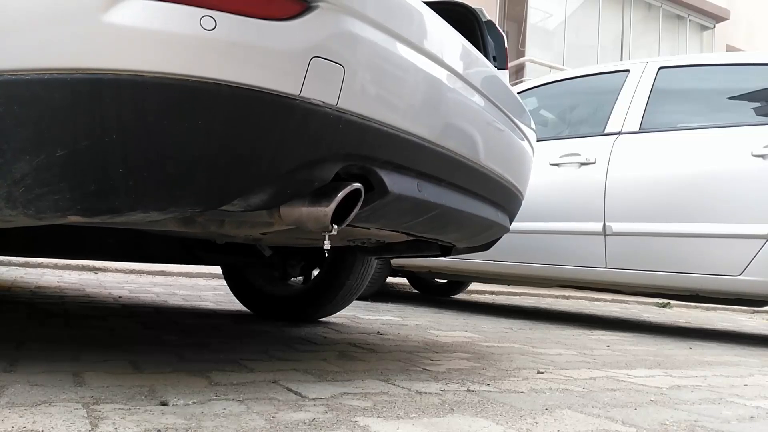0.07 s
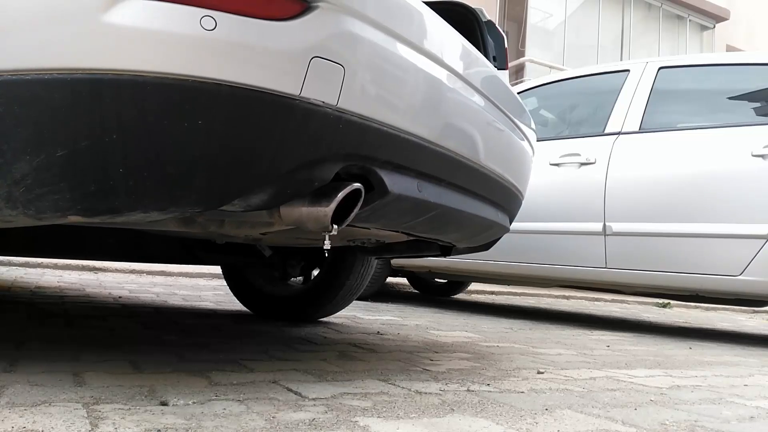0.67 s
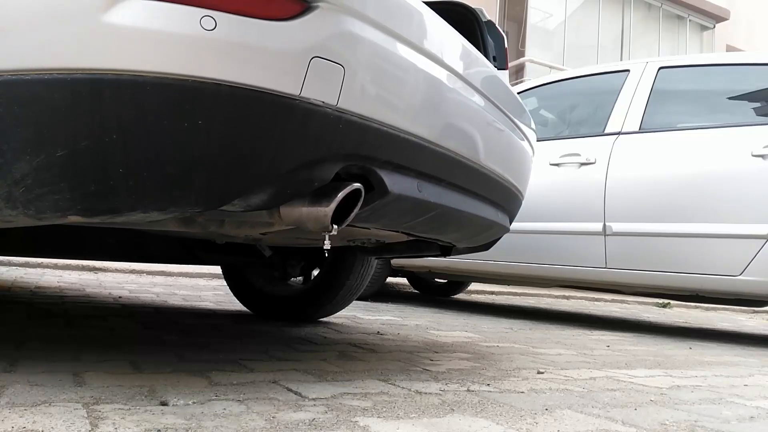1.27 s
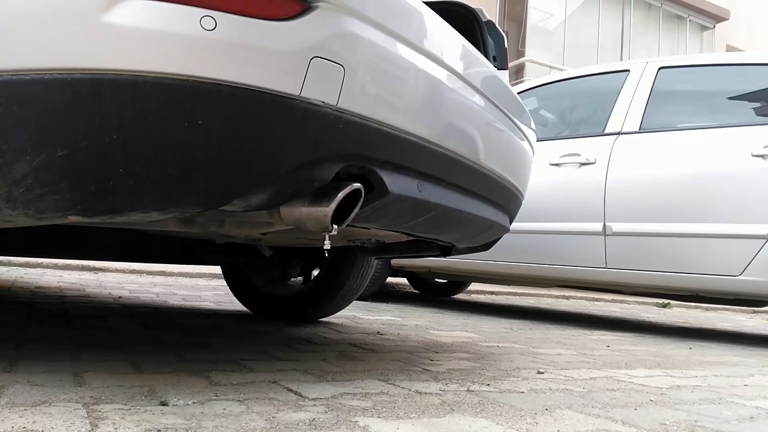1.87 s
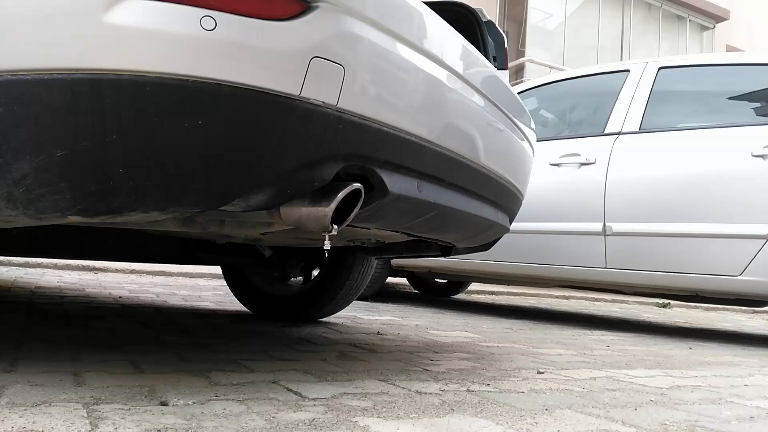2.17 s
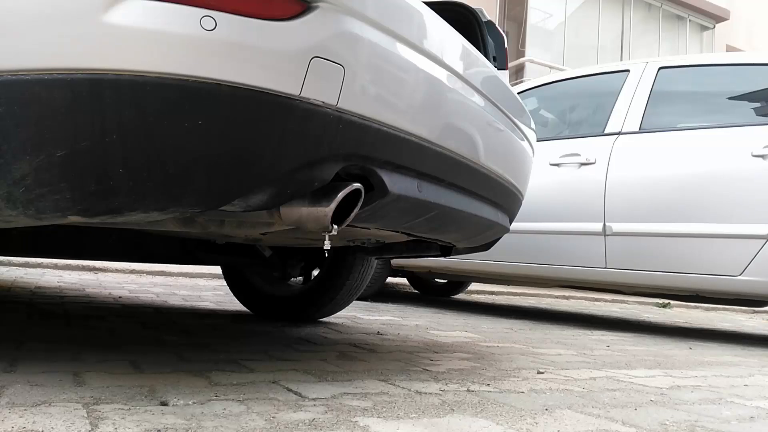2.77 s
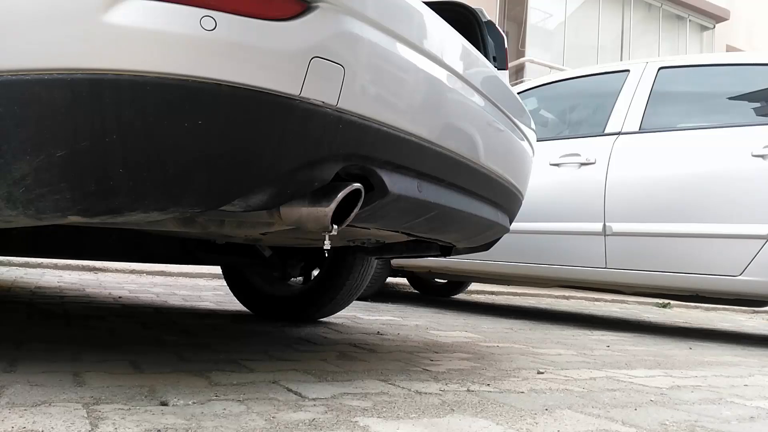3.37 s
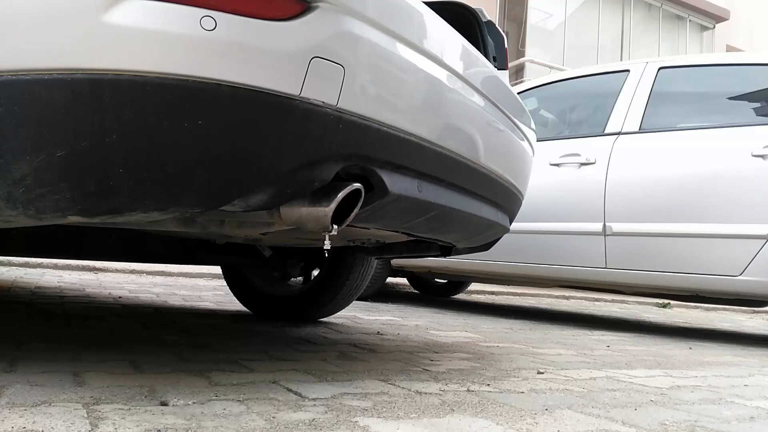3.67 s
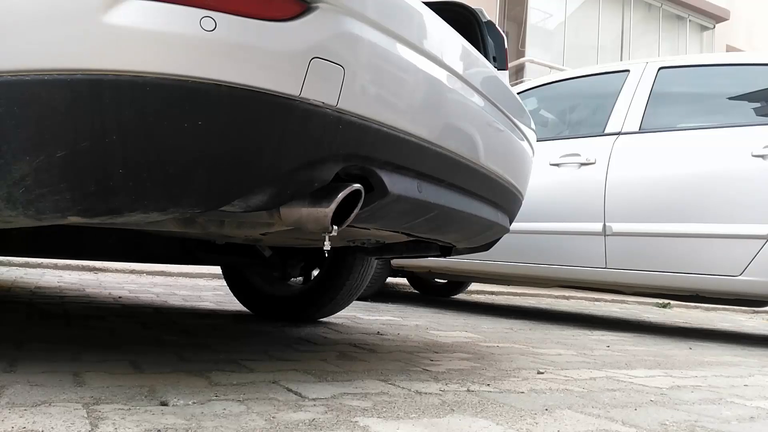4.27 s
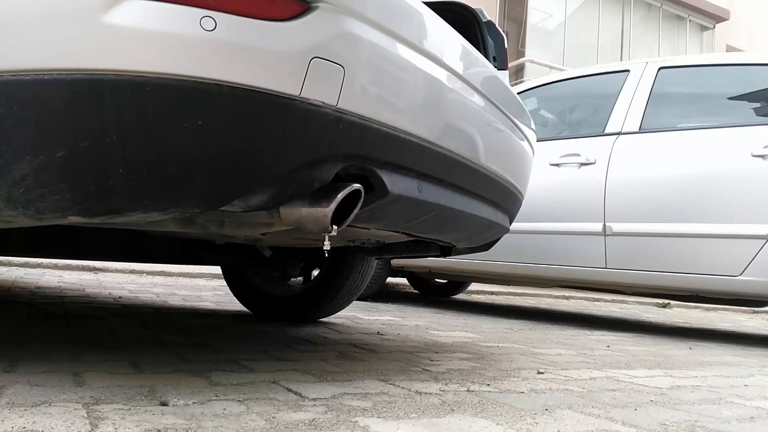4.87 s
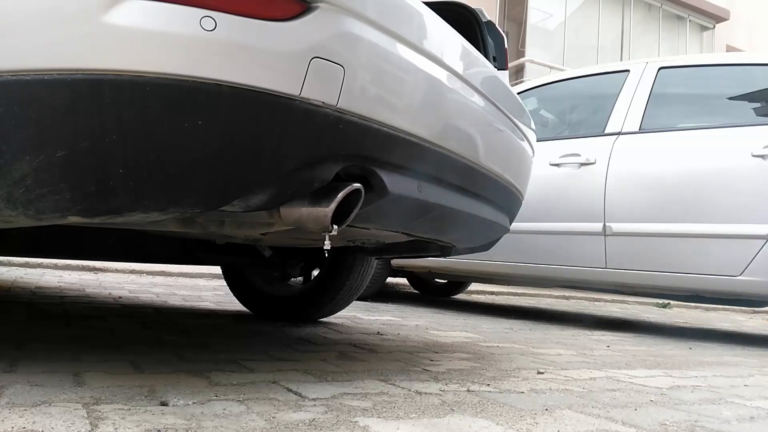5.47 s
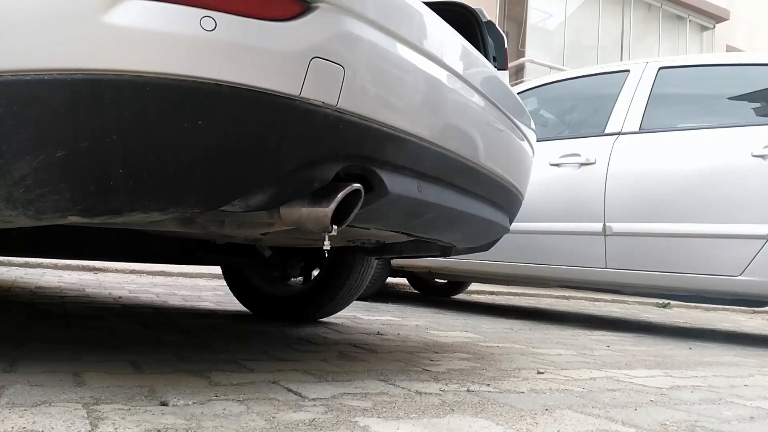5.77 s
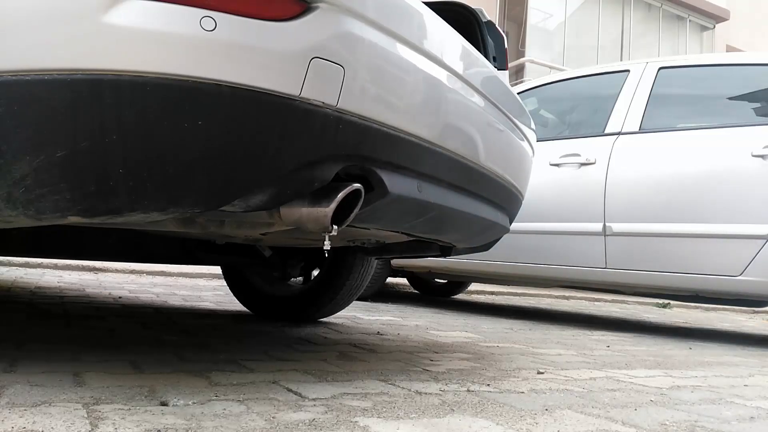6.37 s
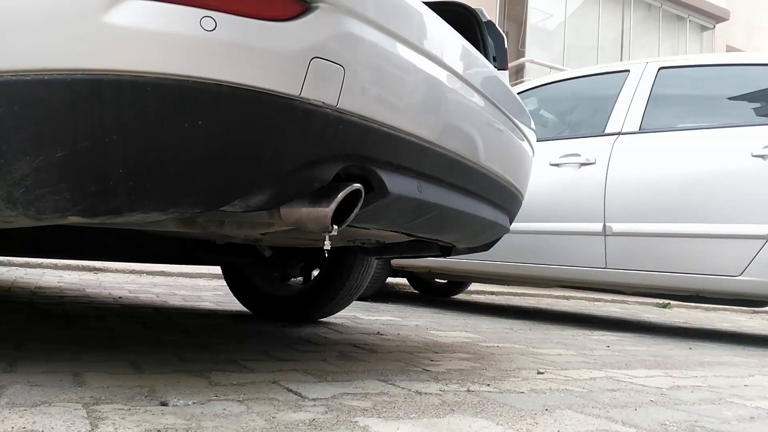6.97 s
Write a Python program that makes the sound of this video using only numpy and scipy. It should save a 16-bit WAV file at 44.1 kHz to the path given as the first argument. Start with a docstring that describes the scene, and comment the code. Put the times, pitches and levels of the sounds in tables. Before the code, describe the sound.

A car starter cranks briefly, then the engine catches, revs up and settles into a droning, lightly clattering idle.

```python
"""A four-cylinder petrol car starts in a quiet paved yard, the microphone low down just behind its tailpipe.
Over the distant town a dull whoosh passes. At 3.4 s the starter clacks in and cranks, its gears grinding.
From 4.1 s the first firings boom and bark in the pipe while metal parts clack; the revs flare and the
silencer growls. By 5.4 s they have sunk to a droning idle, with engine clatter and a hollow knock;
light valve ticks come through, and last the belt slips in small chirps."""
import sys
import numpy as np
from scipy import signal
from scipy.fft import rfft, irfft, next_fast_len
from scipy.io import wavfile
from scipy.ndimage import uniform_filter1d

SR = 44100
rng = np.random.default_rng(int(sys.argv[2]) if len(sys.argv) > 2 else 0)


def generate_wav(sig):
    """Save sig (samples, or channels by samples) to the path in sys.argv[1] as 16-bit PCM at SR."""
    pcm = np.round(np.clip(np.atleast_2d(sig).T, -1, 1) * 32767).astype(np.int16)
    wavfile.write(sys.argv[1], SR, pcm)


N = 309582
T = np.arange(N) / SR
TICK_PHASE = .59  # where the valves tick, in firings

# engine speed as firings a second [t/s, f/Hz]
FIRING_RATE = [(3.45, 5), (4.1, 11), (4.27, 23), (4.47, 41), (4.55, 42.7), (4.77, 34.6), (4.96, 36.7),
               (5.07, 35.7), (5.2, 33.5), (5.35, 32.3), (5.6, 32.2), (6.0, 31.35), (6.4, 30.75),
               (7.02, 30.6)]
# how hard the engine works, relative to idle [t/s, level/dB]
ENGINE_EFFORT = [(4.1, -5), (4.22, -9), (4.28, 3), (4.45, 4.5), (4.66, 0), (4.8, 4.5), (5.2, 1), (5.8, 1.2),
                 (7.0, -1)]
# the first firings, heard in the pipe [t/s, boom/dB, bark/dB, bark f/Hz, nominal bark width/Hz]
FIRST_BLASTS = [(4.109, -25.5, -37, 890, 700), (4.178, -23, -31, 219, 160), (4.234, -20, -34, 500, 700),
                (4.283, -26, -38, 800, 600), (4.318, -22.5, -33, 730, 400), (4.354, -17.5, -40, 700, 500),
                (4.386, -24, -39, 440, 400), (4.411, -32, -27.5, 780, 150), (4.438, -38, -36, 1160, 600),
                (4.461, -40, -34, 694, 250), (4.49, -17, -33.5, 750, 400)]
# metal parts striking as the engine catches [t/s, level/dB, f/Hz, rebound/dB]
METAL_STRIKES = [(4.1808, -26.5, 4110, -19), (4.236, -29, 3890, 1), (4.284, -30.5, 3500, -5),
                 (4.321, -27.5, 4130, -3.5), (4.357, -30.5, 4050, 0.5), (4.391, -30.5, 4280, -10),
                 (4.424, -33, 3650, -22)]


def undb(db):
    """Decibels to gain."""
    return 10 ** (np.asarray(db) / 20)


def unit(x):
    """Scale to rms 1."""
    return x / np.sqrt(np.mean(x ** 2))


def curves(table):
    """Each column after a table's times as a control, sample by sample."""
    times, *columns = np.transpose(table)
    return [np.interp(T, times, column) for column in columns]


def fade_in(start, length):
    """Ramp from 0 to 1 (s)."""
    return np.clip((T - start) / length, 0, 1)


def spell(start, end, edge):
    """Gate that opens at start and closes at end, with soft edges (s)."""
    return fade_in(start - edge / 2, edge) - fade_in(end - edge / 2, edge)


def swell(start, top, release, db, rise_db, fall_db_per_s):
    """Envelope that climbs by rise_db from start to top (s), holds at db and dies after release (s)."""
    level_db = np.interp(T, [start, top], [db - rise_db, db]) - fall_db_per_s * np.maximum(T - release, 0)
    return undb(level_db) * fade_in(start, 0.02)


def noise():
    """White noise."""
    return rng.standard_normal(N)


def walk(rate):
    """Smooth random wander at about rate (Hz), rms 1."""
    step = max(int(SR / rate), 1)
    held = np.repeat(rng.standard_normal(N // step + 1), step)[:N]
    return unit(uniform_filter1d(uniform_filter1d(held, step), step))


def sine(hz):
    """A tone that follows a pitch curve."""
    return np.sin(2 * np.pi * np.cumsum(hz) / SR)


def colour(x, points):
    """Filter by an outline [f/Hz, level/dB] that falls steeply beyond its ends; rms 1."""
    size = next_fast_len(N + 8192)
    f = np.maximum(np.fft.rfftfreq(size, 1 / SR), 1)
    hz, db = np.transpose(points)
    skirts = np.minimum(f / hz[0], 1) ** 2 * np.minimum(hz[-1] / f, 1) ** 2
    gain = undb(np.interp(np.log(f), np.log(hz), db)) * skirts
    return unit(irfft(rfft(x, size) * gain, size)[:N])


def ring(x, modes):
    """Drive a set of resonances [f/Hz, width/Hz, level/dB]; rms 1."""
    return unit(sum((-1) ** k * undb(db) * signal.lfilter(*signal.iirpeak(hz, hz / width, SR), x)
                    for k, (hz, width, db) in enumerate(modes)))


def split(x, hz):
    """The parts of a sound below and above a frequency, each at rms 1."""
    return [unit(signal.sosfilt(signal.butter(4, hz, side, fs=SR, output="sos"), x))
            for side in ("low", "high")]


def blow(t, rise, decay):
    """A straight rise to 1, then an exponential decay (s)."""
    return np.minimum(t / rise, 1) * np.exp(-np.maximum(t - rise, 0) / decay)


def bursts(rows):
    """Envelope of blows [t/s, level/dB, rise/s, decay/s]."""
    out = np.zeros(N)
    for s, db, rise, decay in rows:
        start = int(s * SR)
        t = T[:min(N - start, SR // 2)]
        out[start:start + len(t)] += undb(db) * blow(t, rise, decay)
    return out


def pings(rows):
    """Brief rings [t/s, level/dB, f/Hz, rise/s, decay/s], each wavering slightly in pitch."""
    out, waver = np.zeros(N), .015 * walk(2000)
    for s, db, hz, rise, decay in rows:
        start = min(int(s * SR), N - 1)
        t = T[:min(N - start, SR // 16)]
        span = slice(start, start + len(t))
        out[span] += undb(db) * blow(t, rise, decay) * sine(hz * (1 + waver[span]))
    return out


def underbody(x, decay=0.027, wet_db=-3):
    """Engine-bay sound bounces between floor pan and paving on its way back to the microphone."""
    t = T[:SR // 16]
    echoes = rng.standard_normal(len(t)) * np.exp(-t / decay)
    wet = undb(wet_db) * signal.fftconvolve(x, echoes / np.linalg.norm(echoes))[:N]
    return (x + wet) / np.sqrt(1 + undb(2 * wet_db))


def yard():
    """The town from afar: an uneven rumble, mids that swell and flicker band by band, a thin hiss."""
    # the town's spectrum in the yard [f/Hz, level/dB]
    town_colour = [(82, -25), (140, -4.5), (200, -6), (243, -5.5), (439, -10.5), (524, -13.5), (808, -14),
                   (874, -12), (984, -18), (1550, -26.5), (2000, -26.5), (3400, -38.5), (11500, -37),
                   (15500, -42)]
    # swells of its middle range [t/s, level/dB]
    town_swells = [(0, -60.5), (.55, -61), (.76, -58), (1.0, -59.5), (1.35, -62), (1.5, -58), (1.7, -60),
                   (2.1, -57)]
    mids_db = curves(town_swells)[0] + 1 + 0.32 * walk(5.81)
    bed, mids = colour(noise(), town_colour), 0
    for hz in (330, 620, 1150, 2100, 4500):  # peel off bands until only the hiss remains
        band = signal.sosfiltfilt(signal.butter(4, hz, fs=SR, output="sos"), bed)
        flicker_db = (2 * walk(11) + 3.5 * walk(45)) * min(1, (600 / hz) ** .5)
        mids = mids + band * undb(flicker_db)
        bed = bed - band
    rumble = colour(noise(), [(25, -25), (45, -6.5), (64, -4), (95, -6), (140, -18)])
    return mids * undb(mids_db) + bed * undb(-62) + rumble * undb(-53 + 2 * walk(20))


def far_squeaks(rise=0.028, decay=0.077):
    """Small distant sounds, blurred by the yard."""
    # faint squeaks in the town [t/s, level/dB, f/Hz]
    squeaks = [(.96, -76.5, 3600), (1.45, -74, 1450), (1.7, -76, 3050), (3.07, -75, 3470)]
    blur = lambda hz: colour(noise(), [(.7 * hz, -18), (hz, 0), (1.25 * hz, -18)])
    return sum(blur(hz) * bursts([(s, db, rise, decay)]) for s, db, hz in squeaks)


def whoosh(bright_db=-9.5, dulling_db_per_s=9):
    """A soft rush that swells and dies away, its treble first."""
    # spectrum of the rush [f/Hz, level/dB]
    rush_colour = [(60, -4), (120, -3), (288, 3.5), (421, -0.5), (692, -2), (765, -8.5), (1050, -13.5),
                   (1160, -19.5), (1280, -16), (2960, -29), (4970, -48), (14000, -54.5)]
    level = swell(start=2.31, top=2.48, release=2.68, db=-40, rise_db=10.5, fall_db_per_s=27)
    treble_db = bright_db - dulling_db_per_s * np.abs(T - 2.58)
    low, high = split(colour(noise() * undb(0.75 * walk(150)), rush_colour), 1110)
    return (low + high * undb(treble_db)) * level


def starter(rasp_db=-9, housing_db=-12, hiss_db=-14, pitch_jitter=0.021):
    """The pinion clacks in; its teeth grind, rattle the housing and whirr, slowing at each compression."""
    # pinion and solenoid hitting home [t/s, level/dB, decay/s]
    engagement = [(3.449, -42, 0.01), (3.457, -33.5, 0.014), (3.469, -36.5, 0.047), (3.92, -48.5, 0.035)]
    # spectrum of those blows [f/Hz, level/dB]
    clack_colour = [(88, -37), (150, -15), (320, -1), (453, -10), (530, -3.5), (1150, -20), (1510, -5),
                    (1700, -13), (2760, -15), (3100, -8), (3350, -21), (3760, -14), (4480, -19),
                    (7860, -27), (15500, -37)]
    # the gear mesh under load [t/s, f/Hz, level/dB]
    mesh = [(3.44, 2440, -59), (3.54, 3050, -43), (3.62, 3135, -46.5), (3.68, 3390, -45),
            (3.73, 3300, -43.5), (3.785, 2968, -39.5), (3.83, 2840, -44), (3.905, 2760, -50.5),
            (3.93, 2950, -45), (3.99, 3167, -39), (4.04, 3150, -42.5), (4.1, 3190, -44.5),
            (4.31, 3380, -43), (4.45, 2820, -81)]
    # spectrum of the grinding teeth [f/Hz, level/dB]
    grind_colour = [(76, -4), (130, 1.5), (186, -12.5), (353, -1.5), (449, -12.5), (698, -1.5), (756, -12),
                    (852, -1.5), (1020, -11.5), (2060, -10.5), (3070, -8.5), (5590, -16.5), (7540, -10),
                    (8510, -26), (15500, -38)]
    # resonances of the housing [f/Hz, width/Hz, level/dB]
    housing_modes = [(685, 28, -3.5), (846, 28, -0.5), (1380, 250, -10), (2613, 52, -27), (3064, 25, 2),
                     (3350, 33, -13), (3520, 38, -15), (3700, 9.9, 7.5), (4040, 30, -3), (4650, 95, -13),
                     (5800, 54, -24), (7250, 40, -15), (7800, 140, -13.5), (9500, 128, -17.5)]
    # spells of slack gears [from t/s, to t/s, hiss/dB, mesh whine/dB, overtone/dB]
    slack_spells = [(3.57, 3.593, -68, -44, -62), (3.615, 3.774, -51, -46, -53.5),
                    (3.918, 4, -49.5, -56, -67), (4.217, 4.334, -50, -54, -49)]
    # resonances of the gears [f/Hz, width/Hz, level/dB]
    gear_modes = [(4190, 76, 6), (4800, 140, -17), (6100, 300, -6), (7340, 130, 1.5), (7870, 110, 1),
                  (9480, 120, 1.5)]
    mesh_hz, load_db = curves(mesh)
    slack_hiss, whine, overtone = sum(np.outer(undb(levels_db), spell(start, end, edge=0.025))
                                      for start, end, *levels_db in slack_spells)
    blows = bursts([(s, db, .007, decay) for s, db, decay in engagement])
    clack = blows * (0.86 * colour(noise(), clack_colour) + 0.83 * ring(noise(), housing_modes))
    tooth_count = np.cumsum(mesh_hz * (1 + pitch_jitter * walk(900) + .008 * walk(90))) / SR
    shake = 1 + 0.16 * np.sin(2 * np.pi * tooth_count / 11)  # the armature turns once in eleven teeth
    teeth = noise() * undb(0.58 * walk(500) + 1.87 * walk(45)) * shake
    grind = underbody(colour(teeth, grind_colour), wet_db=-2)
    rattle, _ = split(grind + undb(housing_db) * ring(teeth, housing_modes), 6640)
    rasp = colour(teeth, [(900, -8), (1200, 0), (2000, -6), (3700, 2), (4600, 0), (6400, 0.5),
                          (7000, -13.5)])
    loaded = (undb(-0.5) * rattle + undb(rasp_db) * rasp) * undb(load_db)
    air = colour(teeth, [(5500, -23), (7800, 3), (8500, 0), (10600, -7), (13500, -9), (15500, -11)])
    hiss_gain = undb(load_db + hiss_db) + undb(-7.5) * slack_hiss
    hiss = (0.55 * air + 1.15 * ring(teeth, gear_modes)) * hiss_gain
    # the gears sing in fits while the starter spins freely, and again as the engine overruns it
    partial = lambda ratio: np.sin(2 * np.pi * ratio * tooth_count) * undb(4 * walk(300) + 1.5 * walk(70))
    singing = underbody(whine * partial(1) + overtone * partial(2.31), wet_db=-5)
    return (clack + loaded + hiss + singing) * fade_in(3.44, 0.011) * (1 - fade_in(4.45, .05))


def crank():
    """Count of firings so far; the speed is very slightly uneven."""
    hz, = curves(FIRING_RATE)
    return np.cumsum(hz * (1 + .002 * walk(25))) / SR


def moments(firing, phase, every):
    """Times at which the engine passes a point of its cycle; phase and every count firings."""
    return np.interp(np.arange(phase, firing[-1], every), firing, T)


def strokes(firing, decay, scatter_db):
    """A push at each firing, sized by its cylinder and by chance; decay counts firings."""
    # each cylinder's share of the noise [level/dB]
    cylinder_db = [-0.51, -2.8, -0.57, 0.33]
    count = firing.astype(int)
    size_db = np.take(cylinder_db, count, mode="wrap") + scatter_db * rng.standard_normal(512)[count]
    return undb(size_db) * np.exp(-(firing % 1) / decay)


def cycle_noise(firing, share):
    """Noise of which a share comes round the same in every cycle of four firings."""
    per_firing = SR // 31
    pattern = rng.standard_normal(4 * per_firing)
    repeating = np.take(pattern, (firing * per_firing).astype(int), mode="wrap")
    return np.sqrt(share) * repeating + np.sqrt(1 - share) * noise()


def boom(cold_hz=56.2, hot_hz=61.5, cancel=0.7):
    """Strokes set the pipe's air column swinging, until the firings outrun it and begin to cancel."""
    # cranking strokes that pump air into the pipe [t/s, level/dB]
    pumps = [(3.52, -43), (3.798, -36.5), (3.96, -42.5), (4.07, -34)]
    hz = cold_hz + (hot_hz - cold_hz) * fade_in(4.3, 0.077)  # hot gas fills the pipe
    swing = bursts([(s, db, 0.012, 0.1) for s, db, *_ in pumps + FIRST_BLASTS])
    return np.sqrt(2) * swing * (1 - cancel * fade_in(4.415, 0.025)) * sine(hz)


def gas(firing, idle_db=-40.5):
    """Each firing sends a puff of gas through the silencer: throaty blasts, then a soft putter."""
    # spectrum of the first surge of gas [f/Hz, level/dB]
    surge_colour = [(59, -5), (100, 6), (187, -6), (274, -6.5), (356, -12), (578, -9), (659, -22), (716, 1),
                    (918, -51), (1330, -35), (1700, -29), (2210, -53), (3740, -120)]
    # resonances it drives [f/Hz, width/Hz, level/dB]
    surge_modes = [(155, 24, -0.5), (206.3, 13, 1), (275, 17, 4.5), (595, 24, -3.5), (708, 6.7, 1),
                   (755, 110, -13), (819, 18, 0), (998, 18, -12), (1100, 6.6, -0.5), (1336, 11, -5.5)]
    # spectrum of the running flow [f/Hz, level/dB]
    flow_colour = [(65, -40), (110, -0.5), (134, -2), (235, -10.5), (268, -2.5), (337, -11), (376, -14),
                   (464, -12.5), (646, -24), (699, -1), (781, -31), (983, -17), (1060, -20), (1200, -13),
                   (1560, -58), (2640, -120)]
    # resonances it drives [f/Hz, width/Hz, level/dB]
    flow_modes = [(368, 56, -7), (425, 15, -5), (572, 23, -4.5), (656, 62, -8), (713, 32, -2),
                  (860, 18, -7.5), (997, 56, -14.5)]
    surge_gain = swell(start=4.045, top=4.34, release=4.49, db=-31.5, rise_db=15, fall_db_per_s=90)
    flow_gain = undb(idle_db + curves(ENGINE_EFFORT)[0]) * fade_in(4.5, 0.14)
    puffs = (1 + 0.29 * strokes(firing, decay=0.52, scatter_db=2.5)) * undb(1.2 * walk(60))
    blasts = 0.62 + 0.5 * bursts([(s, 0, .003, .011) for s, *_ in FIRST_BLASTS])
    surge = undb(-1.5) * colour(noise(), surge_colour) + undb(-2.5) * ring(noise(), surge_modes)
    flow = lambda: cycle_noise(firing, share=.6) * puffs
    rush = undb(-4) * (colour(flow(), flow_colour) + ring(flow(), flow_modes))
    flutter = colour(noise(), [(25, -15), (45, 6.5), (70, 5.5), (120, -7), (170, -7)])
    return (surge * blasts + flutter) * surge_gain + (rush + undb(-2.5) * flutter) * flow_gain


def clatter(firing, idle_db=-42.5):
    """Valves and pistons ring the block at each firing, over an even hiss of belts and fan."""
    # spectrum of the engine block [f/Hz, level/dB]
    block_colour = [(590, -10), (1000, -6), (1110, -13), (1350, 2), (1600, -1), (2390, -3), (3150, -1.5),
                    (4050, -3.5), (4540, -9.5), (4810, -12), (5400, -8), (7110, -39), (8340, -16),
                    (13500, -26), (15500, -27)]
    # its resonances [f/Hz, width/Hz, level/dB]
    block_modes = [(1403, 38, -1), (1556, 38, 1.5), (1650, 70, 1), (1720, 23, -3), (1933, 6.3, 3),
                   (2006, 16, 5), (2255, 17, 3), (2975, 79, -3.5), (3185, 38, -2), (3740, 17, 4),
                   (4070, 23, -17), (4190, 41, -1), (4860, 120, -8.5), (5250, 56, -17), (5840, 39, -3.5),
                   (6240, 58, -6.5), (6920, 87, -7.5), (7560, 120, -11), (7900, 47, -7)]
    pushes = strokes(firing + 1 - TICK_PHASE - .06, decay=.4, scatter_db=1.3)
    drive = lambda: cycle_noise(firing, share=.4) * (1 + 1.1 * pushes) * undb(1.5 * walk(600))
    block = undb(-1) * underbody(colour(drive(), block_colour)) + undb(-4.5) * ring(drive(), block_modes)
    return block * undb(idle_db + curves(ENGINE_EFFORT)[0]) * fade_in(4.09, 0.011)


def belt(firing, slip_hz=4580, rise=0.0041, decay=0.012, scrape_db=-13):
    """The belt squeaks as the revs rise and sink, then chirps and rasps once a turn while it slips."""
    # the clearest chirps [t/s, level/dB, f/Hz, decay/s]
    chirps = [(4.1084, -35.5, 4900, 0.0063), (4.451, -43, 4700, .004), (4.492, -36.5, 4810, 0.0048),
              (4.68, -41, 4360, 0.013), (4.74, -45, 4660, 0.0073), (4.769, -37.5, 4870, 0.0067),
              (4.796, -40.5, 5130, .005), (4.802, -39, 3580, 0.0071), (5.182, -48, 4800, .005),
              (5.382, -38.5, 4830, .005), (6.14, -38, 4720, .005), (6.206, -36, 4830, .004)]
    # spells of light slipping [from t/s, to t/s, relative level/dB]
    slip_spells = [(6.24, 6.7, -43), (6.76, 7.0, -40)]
    turns = zip(moments(firing, phase=.9, every=2), rng.standard_normal(128))
    slips = [(s, db - 5 + scatter_db) for s, scatter_db in turns
             for start, end, db in slip_spells if start <= s < end]
    squeaks = [(s, db, hz, rise, length) for s, db, hz, length in chirps]
    squeaks += [(s, db, slip_hz, rise, decay) for s, db in slips]
    scrape = colour(noise(), [(3400, 10), (4600, 8), (5800, -18), (9000, -16)])
    scrape *= bursts([(s, db + scrape_db, rise, length) for s, db, _, _, length in squeaks])
    rasp = ring(noise(), [(slip_hz, 350, 0)]) * bursts([(s, db, rise, decay) for s, db in slips])
    return pings(squeaks) + rasp + scrape


def barks(rise=0.0028, decay=0.014):
    """The first firings bark in the pipe, each in its own resonance, and set thin metal ringing."""
    # thin metal on the exhaust [t/s, level/dB, f/Hz, decay/s]
    shield_rings = [(4.321, -34, 1316, 0.039), (4.321, -40, 1520, 0.016), (4.39, -42.5, 1316, 0.086)]
    out = np.zeros(N)
    for s, _, db, hz, width in FIRST_BLASTS:
        mode = [(hz, 0.95 * width, 0)]
        out += ring(ring(noise(), mode), mode) * bursts([(s, db, rise, decay)])
    for s, db, hz, length in shield_rings:
        out += bursts([(s, db, rise, length)]) * np.sin(2 * np.pi * hz * T)
    return out


def whines(firing):
    """Hollow tones of the pipe and accessories, warbling with each cycle, turn and firing."""
    # the steady tones [f/Hz, relative level/dB]
    pitches = [(372, -54.5), (573, -59.5), (702, -48), (1314, -57.5), (1432, -74), (1653, -62), (1846, -58)]
    tones = sum(undb(db - 4.5 + 2 * walk(30)) * sine(hz + 6 * walk(60)) for hz, db in pitches)
    per_cycle = .7 * np.cos(np.pi * (firing - 1.45) / 2)
    per_turn = .2 * np.cos(np.pi * (firing - 1))
    per_firing = .4 * np.cos(2 * np.pi * (firing + .1))
    return np.sqrt(2) * tones * (1 + per_cycle + per_turn + per_firing) * fade_in(4.17, 0.2)


def clacks(rise=0.0025, ping_decay=0.0026, scrape_decay=0.006, graze_lead_s=0.0061, rebound_s=.005):
    """As the engine catches, metal parts graze, strike and rebound with a crackle, and ring briefly."""
    # modes of the parts [multiple of the strike's pitch, level/dB]
    modes = [(1, 0.5), (.87, -21), (1.36, -12)]
    rings, crunches, grazes = [], [], []
    for s, db, hz, rebound_db in METAL_STRIKES:
        grazes.append((s - graze_lead_s, db - 13.5, rise, scrape_decay))
        for at, blow_db in [(s, db), (s + rebound_s, db + rebound_db)]:
            rings += [(at, blow_db - 1.5 + mode_db, ratio * hz, rise, ping_decay)
                      for ratio, mode_db in modes]
            crunches.append((at, blow_db - 11, rise, scrape_decay))
        rings.append((s + rebound_s, db - 14, hz, rise, 0.014))  # the lingering ring
    crackle = lambda: noise() * undb(4 * walk(2500))
    scrape = colour(crackle(), [(2200, 6), (3000, 0), (4200, 7), (4800, -17), (5700, -7), (9000, -12.5)])
    graze = colour(crackle(), [(4600, -3), (5400, 0), (6400, -6)])
    return pings(rings) + scrape * bursts(crunches) + graze * bursts(grazes)


def ticks(firing, rise=0.0023, decay=0.0096, jolt_db=-18, scatter_db=1.3):
    """Bright valve ticks: one with each first jolt, then one per firing once the idle has settled."""
    # spectrum of a tick [f/Hz, level/dB]
    tick_colour = [(3000, 11.5), (6500, 0), (9700, 1.5), (11500, -7.5), (13700, 1), (15500, -13)]
    # each cylinder's tick [relative level/dB]
    valve_db = [-38.5, -46, -38.5, -46]
    times = moments(firing, TICK_PHASE, every=1)
    peaks_db = np.resize(valve_db, len(times)) - 6.5 + scatter_db * rng.standard_normal(256)[:len(times)]
    idle = bursts([(s, db, rise, decay) for s, db in zip(times, peaks_db)]) * fade_in(5.58, 0.73)
    jolts = bursts([(s, db + jolt_db, rise, decay) for s, db, *_ in METAL_STRIKES])
    return colour(noise(), tick_colour) * (idle + jolts)


def growl(firing):
    """While the revs flare, each firing strikes the silencer's chambers and they ring as a growl."""
    # the chambers' resonances [f/Hz, width/Hz, level/dB]
    chambers = [(148, 13, -5), (272.7, 13, 0.5), (588, 20, -5.5), (707, 14, -7), (1110, 27, -9)]
    pulses = np.diff(np.floor(firing), prepend=0)
    level = swell(start=4.27, top=4.37, release=4.5, db=-42, rise_db=6, fall_db_per_s=82)
    return ring(pulses, chambers) * level


def exhaust(firing, lope_db=-33, flare_db=5.5, imbalance=.1):
    """The pipe drones on the orders of the firing rate, each as loud as the resonance it is passing."""
    # low resonances of the pipe [f/Hz, width/Hz, level/dB]
    pipe_modes = [(63.4, 10, -26), (109.1, 10.2, -29.5)]
    # strength of its pressure pulses [t/s, level/dB]
    pressure = [(4.45, 10), (4.62, -2.5), (4.8, 2.5), (4.92, -0.5), (5.17, -5), (5.38, 1), (6.0, -1.5),
                (6.23, 1), (6.48, -2), (7.0, -2.5)]
    # extra gain of the hum on the third order [t/s, level/dB]
    hum = [(4.45, -5.5), (4.72, -10), (4.82, -2), (4.92, -2), (5.07, 3), (5.13, -6.5), (5.35, 4),
           (5.7, 3.5)]
    # the silencer's response to the higher orders [f/Hz, level/dB]
    silencer = [(125, -54), (150, -49), (165, -53), (190, -52.5), (214, -55), (240, -60.5), (272, -53),
                (295, -56), (320, -52), (345, -65.5), (372, -53.5), (410, -55), (450, -64), (530, -67),
                (575, -60.5), (640, -62), (700, -60), (760, -70.5), (845, -62), (900, -72), (975, -61.5),
                (1100, -80)]
    hz, = curves(FIRING_RATE)
    pulse = undb(curves(pressure)[0])
    pipe = lambda f: abs(sum(undb(db) / (1 + 1j * mode_hz / width * (f / mode_hz - mode_hz / f))
                             for mode_hz, width, db in pipe_modes))
    gains = [pulse * pipe(k * hz) for k in (1, 2, 3)]
    lope = undb(lope_db) * (1 - fade_in(4.72, 0.057))  # the firing rate itself throbs in the flare
    gains[0] = gains[0] * undb(-6) + lope
    gains[2] *= undb(curves(hum)[0])
    # higher orders grow with speed, and most at the top of the flare
    load_db = 55 * np.log10(np.minimum(hz, 37) / 34) + flare_db * (1 - fade_in(4.5, 0.096))
    gains += [undb(np.interp(k * hz, *np.transpose(silencer)) + load_db) for k in range(4, 33)]
    drone = np.zeros(N)
    for k, gain in enumerate(gains, 1):
        wander_db = (.6 if k <= 3 else 1) * walk(9)
        drone += gain * undb(wander_db) * np.sin(2 * np.pi * (k * firing + rng.random()))
    throb = 1 + imbalance * np.cos(np.pi * firing / 2)  # unequal cylinders, once a cycle
    return np.sqrt(2) * drone * throb * fade_in(4.39, 0.12)


def sizzle(ticks_per_s=130, scatter_db=3, rise=0.0015, decay=0.0028, hiss_db=-11):
    """Tiny irregular ticks from the engine bay, each at its own pitch, over a narrow hiss."""
    # the sizzle swells as the idle settles [t/s, level/dB]
    levels = [(4.5, -56), (5.25, -50.5), (5.55, -50), (5.9, -45.5), (6.15, -56)]
    pitches_hz = [5710, 6350, 6880, 6340, 7150, 5080]
    gap, pick, detune = rng.random((2048, 3)).T
    times = levels[0][0] + np.cumsum(-np.log(1 - gap)) / ticks_per_s
    sizes_db = scatter_db * rng.standard_normal(2048)
    hz = np.take(pitches_hz, (pick * len(pitches_hz)).astype(int)) * (1 + 0.063 * (detune - .5))
    grains = pings([(s, db, f, rise, decay) for s, db, f in zip(times, sizes_db, hz) if s < T[-1]])
    hiss = colour(noise(), [(5200, -36), (5800, -7), (6300, 3), (7000, -6), (7700, -10)])
    return (grains + undb(hiss_db) * hiss * fade_in(5.1, 0.088)) * undb(curves(levels)[0])


def knocks(firing, rise=0.0019, scatter_db=0.7, rattle_db=-15):
    """A small hollow knock that comes round once every two turns; it emerges as the idle settles."""
    # what the knock rings with [f/Hz, level/dB, decay/s]
    modes = [(1660, -13, 0.0049), (1818, -8.5, 0.0092), (1967, -7.5, 0.012)]
    times = moments(firing, phase=1.81, every=4)
    dips_db = scatter_db * rng.standard_normal(64)
    body = pings([(s, db - dip_db, hz, rise, decay)
                  for s, dip_db in zip(times, dips_db) for hz, db, decay in modes])
    rattle = ring(noise(), [(1700, 220, 0), (1990, 410, 0)])
    rattle *= bursts([(s, rattle_db, rise, .009) for s in times])
    return (body + rattle) * swell(start=5.1, top=5.9, release=6, db=-33.5, rise_db=6, fall_db_per_s=1)


def scene():
    """One low microphone: the tailpipe close by, the engine bay a car's length off, the town beyond."""
    firing = crank()
    tailpipe = boom() + barks() + growl(firing) + exhaust(firing) + gas(firing) + whines(firing)
    engine_bay = (starter() + clatter(firing) + knocks(firing) + clacks() + belt(firing)
                  + ticks(firing) + sizzle())
    return (tailpipe + engine_bay + yard() + far_squeaks() + whoosh())[None]


def record(dry, top_hz=15600):
    """The recorder cuts the top steeply."""
    return signal.sosfilt(signal.ellip(10, .2, 80, top_hz, fs=SR, output="sos"), dry)


dry = scene()
out = record(dry)
generate_wav(out)
```